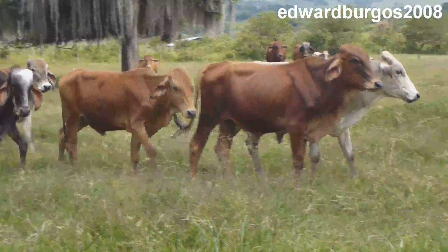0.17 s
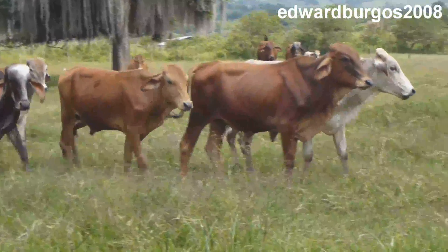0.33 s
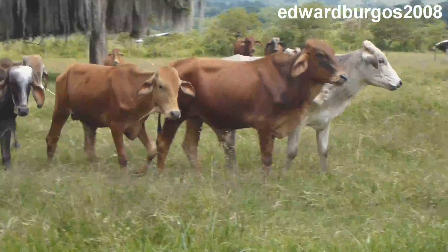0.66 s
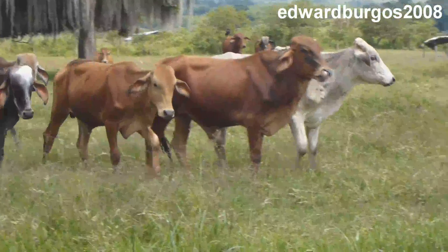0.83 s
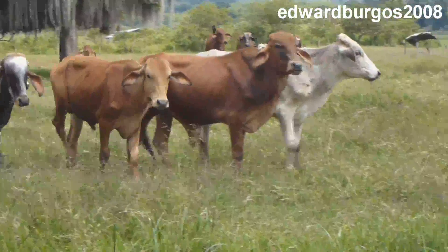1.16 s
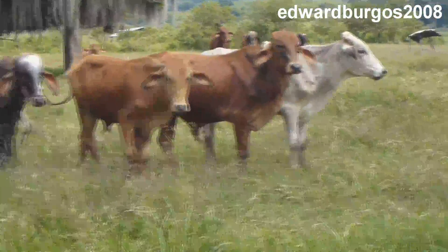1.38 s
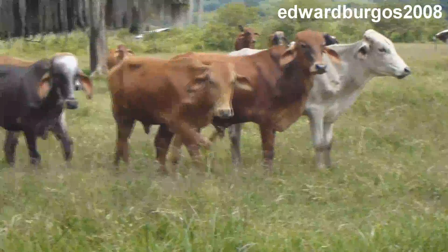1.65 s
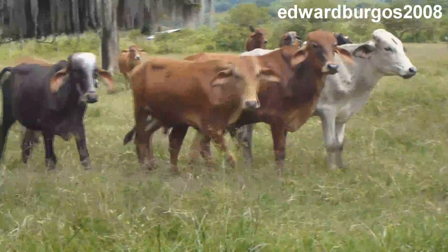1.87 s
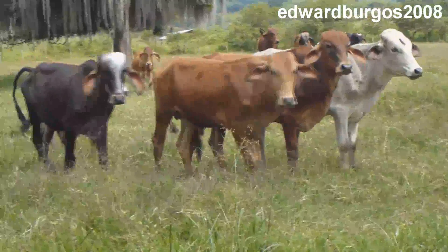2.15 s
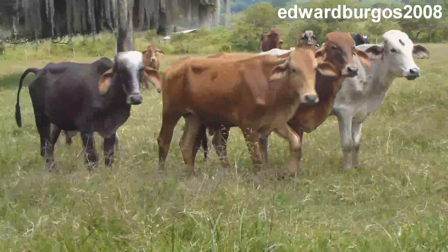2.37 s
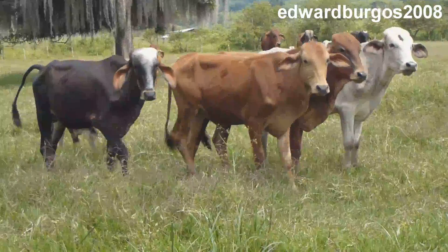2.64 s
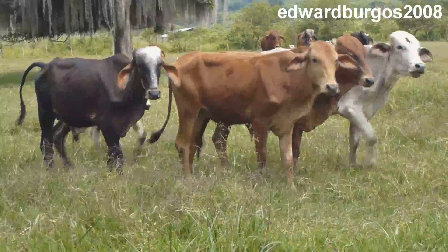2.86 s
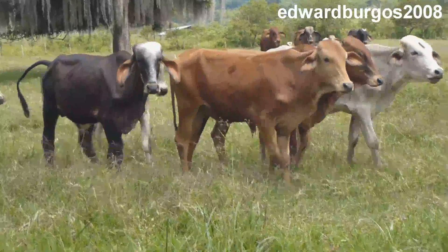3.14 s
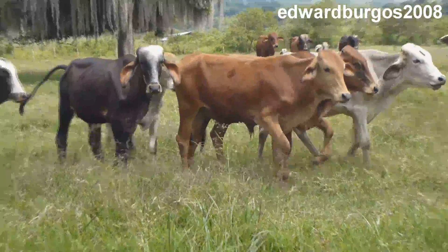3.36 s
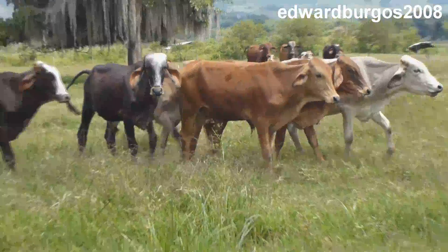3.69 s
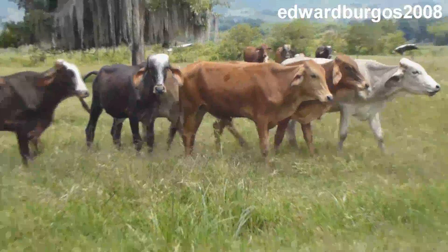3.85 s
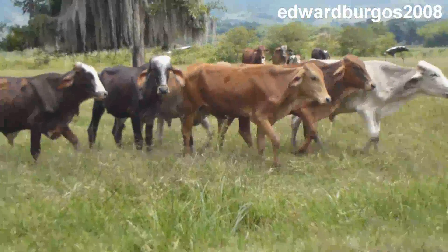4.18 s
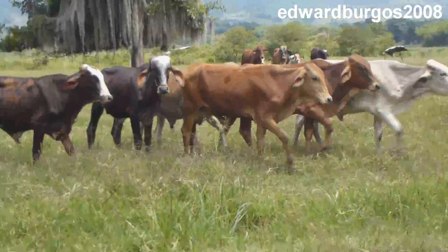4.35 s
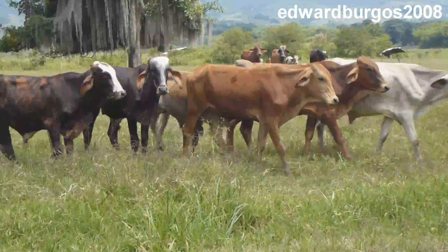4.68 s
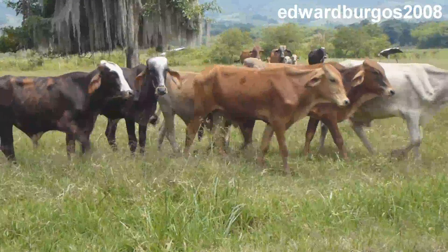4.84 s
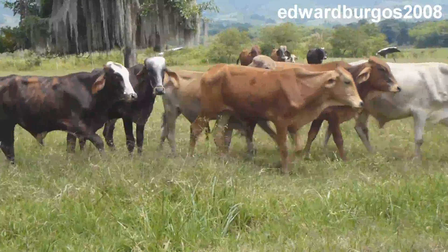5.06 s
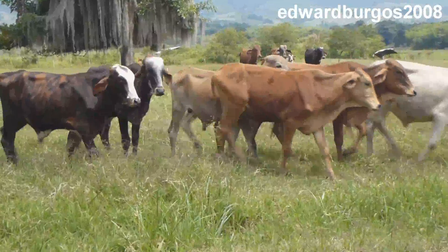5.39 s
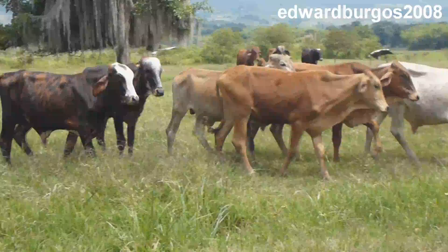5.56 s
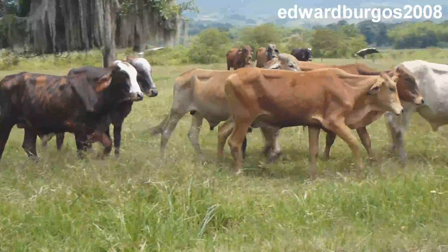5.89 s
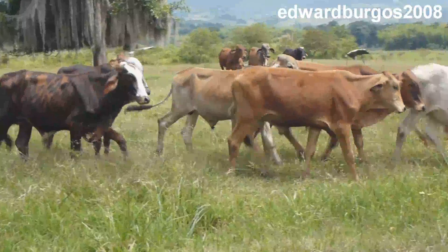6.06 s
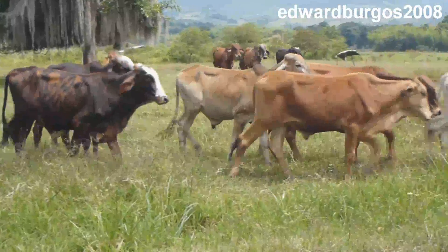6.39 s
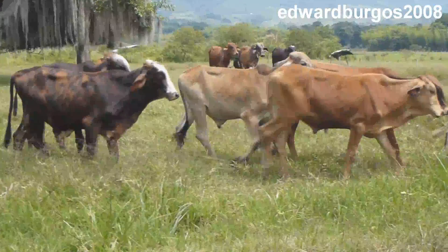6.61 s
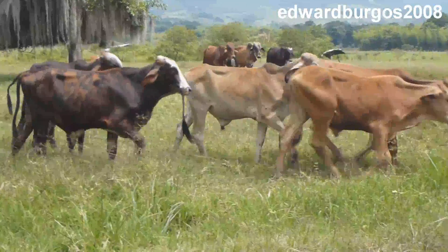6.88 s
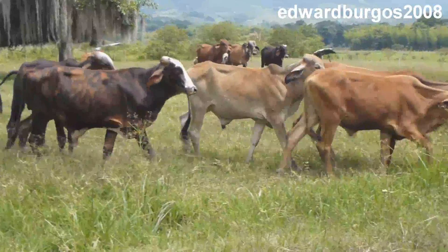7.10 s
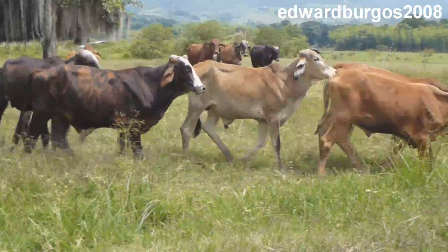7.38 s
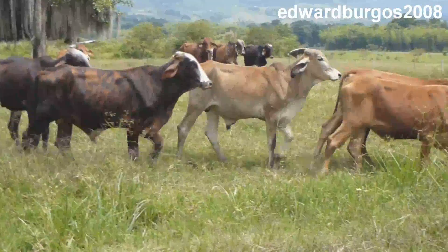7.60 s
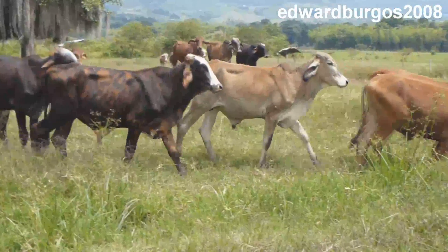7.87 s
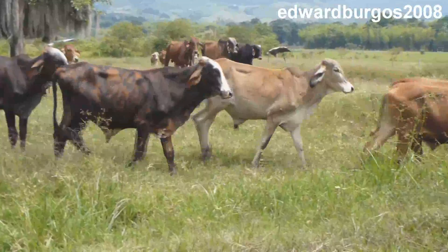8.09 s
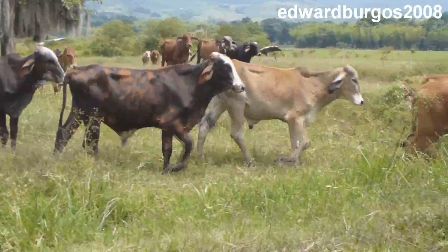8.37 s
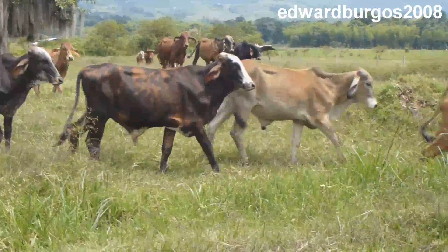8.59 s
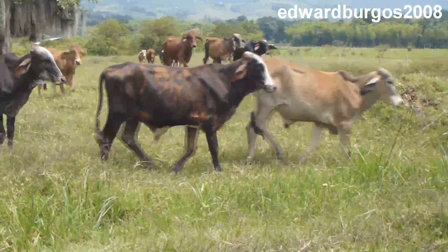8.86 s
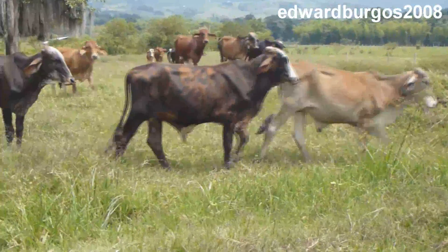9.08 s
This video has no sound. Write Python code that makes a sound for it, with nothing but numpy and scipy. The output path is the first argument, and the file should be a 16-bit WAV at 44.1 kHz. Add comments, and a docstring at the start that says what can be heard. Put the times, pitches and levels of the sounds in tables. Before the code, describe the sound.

A calf gives one long moo, hum opening to a high cracking call, as a bird whistles repeatedly in a breezy, grassy pasture.

```python
"""A calf gives one long moo in a breezy pasture: a closed-mouth hum opens into a bright call, flips up two octaves
and breaks off in a rasp. Its voice is sums of harmonics shaped by moving resonances, with noise for rough breath.
A near-sine whistle, likely a bird, repeats its rise, dip and flick; gliding sines chirp far off and one peep is nearer.
Grass hisses and ticks (shaped noise), and puffs of low noise are wind thumping on the two microphone ports."""
import sys
import numpy as np
from scipy import signal
from scipy.io import wavfile
from scipy.ndimage import uniform_filter1d

SR = 44100
rng = np.random.default_rng(int(sys.argv[2]) if len(sys.argv) > 2 else 0)


def wav_record(signal):
    """Record a signal, one row per channel, as 16-bit PCM in the file named by sys.argv[1]."""
    frames = np.transpose(np.atleast_2d(signal))
    bounded = np.clip(frames, -1, 1)
    # unit amplitude maps onto the largest positive 16-bit level
    quanta = np.round(bounded * 32767).astype(np.int16)
    wavfile.write(sys.argv[1], SR, quanta)


N = 407528
TIME = np.arange(N) / SR


def from_db(db):
    """Decibels to gain."""
    return 10 ** (np.asarray(db) / 20)


def rms_one(x):
    """Scale to rms 1."""
    return x / np.sqrt(np.mean(x ** 2) + 1e-20)


def evened(noise, size=1100):
    """Noise held at rms 1 from moment to moment, over a window of size samples."""
    return noise / np.sqrt(uniform_filter1d(noise ** 2, size=size, axis=1))


def in_time(rows, t=TIME):
    """The columns of a curve at times t; the first column is time."""
    s, *columns = np.transpose(rows)
    return [np.interp(t, s, c) for c in columns]


def at_hz(points, hz):
    """A spectrum in dB read on a log-frequency axis."""
    f, db = np.transpose(points)
    return np.interp(np.log(hz), np.log(f), db)


def drift(rate_hz):
    """Slow chance with spread 1: noise through a double one-pole low-pass at rate_hz, run at SR / 20."""
    r = np.exp(-40 * np.pi * rate_hz / SR)
    slow = signal.lfilter([1], [1, -2 * r, r * r], rng.standard_normal(N // 20 + 4002))
    slow = slow[4000:]  # drop the filter's settling
    return np.interp(np.arange(N) / 20, np.arange(len(slow)), rms_one(slow))


def band(x, low, high):
    """Band-pass between two frequencies in Hz."""
    return signal.sosfilt(signal.butter(2, [low, min(high, SR / 2 - 100)], "band", fs=SR, output="sos"), x)


def smooth(x, hz):
    """Steep low-pass."""
    return signal.sosfilt(signal.butter(8, hz, fs=SR, output="sos"), x)


def peak(hz, centre_hz, width_hz):
    """The bell shape of a resonance, 1 at its centre."""
    return 1 / (1 + (2 * (hz - centre_hz) / width_hz) ** 2)


def ramp(start, length):
    """From 0 to 1 over a length of time in seconds."""
    return np.clip((TIME - start) / length, 0, 1)


def gate(start, attack, end, release):
    """Attack, hold and release between two moments."""
    return ramp(start, attack) * (1 - ramp(end - release, release))


def swell(at, length):
    """A smooth bump about a moment."""
    return np.exp(-np.minimum((2 * (TIME - at) / length) ** 2, 50))


def pan(db):
    """Left and right gains for a level difference; positive is louder on the left."""
    gains = from_db(np.array([[db], [-db]]) / 2)
    return gains / np.sqrt(np.mean(gains ** 2))


def delayed(x, s):
    """The same sound, s seconds later."""
    return np.interp(TIME - s, TIME, x, left=0)


def scatter(x, t60, count=60):
    """Faint reflections from ground, animals and trees, falling 60 dB in t60 s, different at each port."""
    out = np.zeros((2, N))
    for side in out:
        lags = rng.uniform(0.0028, t60, count)
        gains = from_db(-60 * lags / t60) * rng.choice([-1, 1], count)
        gains = gains / np.linalg.norm(gains)
        for lag, gain in zip((lags * SR).astype(int), gains):
            side[lag:] += gain * x[:N - lag]
    return out


def banded_noise(spectrum, alike, patchy_db, flicker_rate_hz):
    """Half-octave bands of noise, each flickering on its own; alike is the ports' correlation; rms 1."""
    out, alike = 0, np.clip(alike, 0, 1)
    edges = 2 ** np.arange(np.log2(spectrum[0][0]), np.log2(spectrum[-1][0]) + .5, .5)
    white = rng.standard_normal((2, 2, N))
    shared = np.sqrt(1 + alike) * white[:, :1]
    opposed = np.sqrt(1 - alike) * white[:, 1:] * [[1], [-1]]
    ports = shared + opposed
    for k, (low, high) in enumerate(zip(edges, edges[1:])):
        gain = from_db(at_hz(spectrum, np.sqrt(low * high)) + patchy_db * drift(flicker_rate_hz))
        out = out + gain * band(ports[k % 2], low, high)  # neighbouring bands use independent noise
    return rms_one(out)


def field():
    """The low, restless murmur of the breeze over open ground: flickering bands of noise."""
    # slow loudness of the open air before the trim: time_s, level_db
    air_level = [(.25, -53), (1.1, -46.5), (4.8, -49), (5.6, -46), (7.3, -51.5), (8.4, -51.5),
                 (9.24, -47.5)]
    # its colour: frequency_hz, density_db (relative dB per Hz)
    air_colour = [(30, -9), (80, 3), (160, 0), (280, -5.5), (450, -16), (750, -13.5), (1100, -22.5),
                  (2000, -22), (3500, -45.5)]
    murmur = banded_noise(air_colour, alike=0.23, patchy_db=3.0, flicker_rate_hz=4.35)
    return from_db(in_time(air_level)[0] + 5.5) * murmur


def faint_puffs():
    """Small puffs, evenly spaced but for random jitter, as rows like the strong ones."""
    rate_per_s, length_s, flutter_db = 3, 0.035, -11
    mean_db, spread_db, mean_side_db = -45.5, 4.5, 7
    draws = rng.standard_normal((int(rate_per_s * N / SR), 3))
    return [((k + .5 + 0.304 * late) / rate_per_s, length_s, mean_db + spread_db * size,
             mean_side_db + 5 * side, flutter_db)
            for k, (late, size, side) in enumerate(draws)]


def wind(flutter_share=0.81, fine_db=-14):
    """Each puff is a short lump of low turbulence; the sharper it is, the more small and fine eddies it sheds."""
    # strong puffs on the ports: middle_s, length_s, level_db, left_right_db, flutter_db (against the puff)
    strong_puffs = [(.008, 0.021, -23.5, 2, -6.5), (.06, 0.042, -23.5, -1, -4.5),
                    (.171, 0.056, -23.5, -2.5, 0), (.226, 0.037, -18, -6.5, -2.5),
                    (.4, 0.083, -29.5, -2, -21), (.672, 0.052, -26, -0.5, -5.5),
                    (.79, 0.042, -29.5, -8, -33), (.857, .044, -33, -6, -10),
                    (1.281, 0.054, -37.5, -2, -19), (1.448, 0.038, -33, 4, -16),
                    (1.552, 0.057, -22.5, -5, -14), (1.594, 0.048, -22.5, -3, -9.5),
                    (1.672, 0.025, -22.5, -6.5, -12), (1.735, 0.06, -27.5, -7, -23),
                    (1.875, 0.028, -23, -4, -13), (1.93, 0.032, -26.5, -7, -34),
                    (2.04, 0.28, -35.5, -2, -27), (2.435, 0.052, -36.5, 6, -15),
                    (3.177, .044, -31.5, -16, -14), (3.24, 0.04, -29, 11, -18),
                    (3.348, 0.041, -29, -1, -18), (3.432, 0.062, -30.5, -11, -24),
                    (3.668, .044, -33, -12, -5), (3.93, 0.052, -25.5, -2, -8), (4.024, 0.037, -36, -6, -17),
                    (4.9, 0.094, -35, -0.5, -20), (5.444, 0.035, -35, 2, -15),
                    (5.674, 0.032, -20.5, 3, -8.5), (5.84, 0.096, -29.5, -4, -10.5),
                    (6.285, 0.035, -23.5, 3, -8), (6.415, 0.049, -37, -4, -1),
                    (6.57, 0.033, -20.5, -4.5, 1), (6.634, 0.044, -28.5, 4, -4),
                    (7.009, 0.032, -30.5, -2, -3.5), (7.059, 0.04, -24.5, 1, -7.5),
                    (7.173, 0.04, -27.5, 10, -32), (7.386, 0.019, -20.5, -6, -27),
                    (7.495, 0.027, -19.5, -10, -5.5), (7.548, 0.043, -21.5, -7, -5),
                    (7.609, 0.077, -26, 2, -4), (7.65, .04, -24.5, -3, -2.5), (7.685, 0.046, -29, -2, 0.5),
                    (7.733, 0.044, -27, -7, 0.5), (7.785, 0.048, -29.5, 0, -0.5),
                    (7.839, 0.027, -25, 0, -22), (7.896, 0.057, -25.5, -1, -6),
                    (7.929, 0.037, -26, -4.5, 0.5), (8.045, 0.076, -32, 0, -30),
                    (8.212, 0.041, -29, 0, -24), (8.279, 0.054, -26, 7, -29),
                    (8.379, 0.088, -33, -0.5, -26), (8.638, 0.041, -32, -2, -23),
                    (8.723, 0.049, -25, -6.5, -4.5), (8.807, 0.098, -33.5, -10, -6),
                    (9.021, 0.085, -35, 2, -28)]
    # large, small and finest eddies, each: frequency_hz, density_db (relative dB per Hz)
    large_colour = [(25, -17), (50, -9), (90, 2), (140, 1.5), (200, -7.5), (280, -50)]
    small_colour = [(150, 9), (220, 11.5), (310, -4.5), (430, -27), (600, -49)]
    fine_colour = [(250, -3), (350, 5), (430, -4), (500, -8)]

    rumble, flutter, sharp = np.zeros((3, 2, N))  # power envelopes at the two ports
    for at, length, level_db, side_db, flutter_db in list(strong_puffs) + faint_puffs():
        on = slice(*np.searchsorted(TIME, [at - 4 * length, at + 4 * length]))
        power = (from_db(level_db) * pan(side_db)) ** 2
        away = 2 * (TIME[on] - at) / length
        rumble[:, on] += power / (1 + away ** 2) ** 3
        # the flutter is squeezed closer to the puff's middle
        shed = power * from_db(flutter_db) ** 2 / (1 + (away / flutter_share) ** 2) ** 3
        flutter[:, on] += shed
        sharp[:, on] += shed * from_db(flutter_db) ** 2
    large = evened(banded_noise(large_colour, alike=0.13, patchy_db=3, flicker_rate_hz=21.3))
    small = evened(banded_noise(small_colour, alike=0.054, patchy_db=5.5, flicker_rate_hz=10.2))
    fine = evened(banded_noise(fine_colour, alike=0.028, patchy_db=-3.5, flicker_rate_hz=19))
    return np.sqrt(rumble) * large + np.sqrt(flutter) * small + from_db(fine_db) * np.sqrt(sharp) * fine


def grass(hiss_db=4, ticks_per_s=90, ticks_db=-13):
    """A soft noise hiss of blades, tiny random ticks of dry stalks, and a few close swishes of noise."""
    # slow loudness of the grassy hiss, often sinking around strong wind puffs, before hiss_db: time_s, level_db
    hiss_level = [(0.0, -59.5), (0.28, -60), (1.34, -54.5), (1.83, -58), (2.91, -51), (4.01, -55),
                  (5.43, -48.5), (5.68, -53), (6.1, -51), (6.74, -55), (7.59, -52), (7.95, -55.5),
                  (8.98, -48), (9.24, -51.5)]
    # colour of the blades: frequency_hz, density_db (relative dB per Hz)
    blade_colour = [(880, -37), (1500, -9), (2490, -3), (3000, -2.5), (3520, -3), (3960, 0), (10000, -2.5),
                    (11900, -5), (15200, -8), (16000, -17)]
    # stalks brushed close by: middle_s, length_s, lowest_hz, highest_hz, level_db
    swishes = [(2.598, 0.082, 1800, 6600, -43), (4.141, 0.045, 6800, 15000, -35),
               (4.232, 0.05, 3480, 6950, -43)]

    level_db, = in_time(hiss_level)
    hiss = banded_noise(blade_colour, alike=0.019, patchy_db=2.5, flicker_rate_hz=7.7)
    sizes = from_db(np.minimum(rng.exponential(1, (2, N)), 4))
    struck = rng.random((2, N)) < ticks_per_s / SR
    ticks = rms_one(band(sizes * struck, 2500, 10300))
    out = from_db(level_db + hiss_db) * (hiss + from_db(ticks_db) * ticks)
    for at, length, low_hz, high_hz, swish_db in swishes:
        brushed = rms_one(band(rng.standard_normal((2, N)), low_hz, high_hz))
        out += from_db(swish_db) * pan(1.8) * swell(at, length) * brushed
    return out


def far_birds(echo_t60=.17):
    """Short fluttering sine glides on the left, blurred by distance through scattered reflections."""
    # distant chirps: middle_s, length_s, start_hz, end_hz, level_db (before flutter)
    chirps = [(0.252, 0.085, 2740, 2900, -58), (0.318, 0.093, 2900, 2770, -51), (.4, .09, 2720, 2470, -58),
              (1.508, 0.14, 5500, 6240, -49.5), (1.771, .04, 3680, 3800, -33.5),
              (4.738, 0.092, 4960, 4800, -50), (4.878, 0.033, 4700, 4710, -33.5),
              (5.178, 0.093, 5140, 4640, -45), (5.324, 0.04, 4400, 4160, -42), (5.39, .04, 3850, 3580, -40),
              (5.445, 0.042, 3650, 4130, -45), (5.478, .04, 4000, 3680, -39.5),
              (5.53, 0.044, 3750, 3490, -43), (5.567, .04, 3580, 4040, -43),
              (5.675, 0.054, 4930, 4690, -46), (5.823, 0.034, 4960, 4450, -41),
              (5.862, 0.068, 3970, 3850, -44), (5.91, 0.035, 3200, 3340, -44),
              (5.932, 0.042, 3470, 3770, -38), (5.994, 0.084, 3010, 2910, -37),
              (6.052, 0.036, 3200, 3720, -43), (6.06, 0.042, 2800, 2620, -41.5),
              (6.111, 0.057, 2500, 2403, -45)]
    waver, flutter_db = .022, 4
    out, wobble = np.zeros(N), 1 + waver * drift(120)
    flutter = from_db(flutter_db * (drift(90) - .5))
    for at, length, start_hz, end_hz, level_db in chirps:
        on = np.abs(TIME - at) < length  # soft edges reach past the nominal length
        glide = (TIME[on] - at) / length + .5
        pitch = (start_hz + (end_hz - start_hz) * glide) * wobble[on]
        note = np.sin(2 * np.pi * np.cumsum(pitch) / SR)
        out[on] += from_db(level_db) * flutter[on] * np.hanning(len(pitch)) ** 2 * note
    return out * pan(25) + 0.56 * scatter(out, echo_t60)


def whistle_shape(at, lead, scoop, rise, sag, flick, start_hz, knee_hz, crest_hz, dip_hz, end_hz,
                  rise_db, crest_db, dip_db):
    """Pitch, loudness and huskiness of one whistle: a soft scoop, a crest, a sag and a flick that breaks up."""
    attack_s, release_s, hold_share = .02, 0.051, 0.59  # the rise holds its level for hold_share of its length
    lead_in_db, catch_s = -10, 0.023  # it starts weak and husky, then the tone catches
    lead_in_hoarse, flick_hoarse = .25, .6  # noisy share of the power added there
    knee, crest, dip, end = at + scoop, at + rise, at + rise + sag, at + rise + sag + flick
    # a long rise is slow to get going, a short one levels off early
    climb = ramp(knee, crest - knee) ** max((rise / .25) ** 2, .7)
    pitch = (start_hz + (knee_hz - start_hz) * ramp(at, scoop) ** 1.5
             + (crest_hz - knee_hz) * climb
             + (dip_hz - crest_hz) * np.sin(np.pi / 2 * ramp(crest, sag)) ** 2
             + (end_hz - dip_hz) * ramp(dip, flick) ** 1.5)
    leading = 1 - ramp(at + lead - catch_s / 2, catch_s)
    level_db = np.interp(TIME, [at + hold_share * rise, crest, dip], [rise_db, crest_db, dip_db])
    level_db = level_db + lead_in_db * leading
    husky = lead_in_hoarse * leading + flick_hoarse * ramp(dip, flick) ** 2
    return pitch, from_db(level_db) * gate(at, attack_s, end, release_s), husky


def whistler(waver=0.006, strain_hz=2900, near_db=-7, near_t60=.2, far_db=-17, far_t60=0.8, split_db=-11,
             split_hz=450, hiss_db=-18, octave_db=-31, port_lag_s=.000045):
    """A near-sine from the right, fluttering with reflections; noise splits it when high and at both ends."""
    # whistles, levels before the trim: start_s, lead_in_s, scoop_s, rise_s (from the start), sag_s, flick_s,
    # start_hz, knee_hz, crest_hz, dip_hz, end_hz, rise_db, crest_db, dip_db
    whistles = [(1.367, 0.051, 0.096, 0.22, .12, 0.078, 2220, 2802, 3176, 2800, 3404, -22.5, -36, -26),
                (2.56, 0.071, .133, .253, 0.091, 0.088, 2270, 2728, 2940, 2686, 3124, -21.5, -29.5, -22),
                (3.78, .025, .041, .155, .105, .105, 2300, 2524, 2738, 2622, 2990, -29, -25.5, -28.5),
                (5.352, .053, .058, .333, 0.071, 0.065, 2220, 2660, 3045, 2885, 3220, -28.5, -50, -32.5),
                (6.648, 0.025, .055, .185, .09, .1, 2330, 2490, 2793, 2700, 3094, -34.5, -34, -35.5),
                (7.775, .075, .13, 0.21, .13, 0.081, 2440, 2807, 2722, 2706, 3180, -35, -40, -36),
                (9.021, 0.04, 0.079, 0.2, 0.11, .1, 2310, 2550, 2634, 2580, 3100, -39, -39.5, -40)]
    # moments when reflections strengthen or weaken the whistle: middle_s, length_s, change_db
    reflection_changes = [(1.473, 0.024, 4), (1.676, 0.047, 10.5), (1.692, 0.015, -13.5),
                          (1.719, 0.028, -18), (2.745, 0.017, 4.5), (2.944, 0.011, 3.5), (3.864, .016, -5),
                          (3.898, 0.039, 6.5), (4.022, 0.031, -9), (4.086, 0.032, 4), (5.456, 0.011, -7),
                          (5.478, .045, 9), (5.717, .03, -7), (5.78, 0.037, 2.5), (6.695, 0.022, 2),
                          (6.9, 0.025, 7), (7.002, 0.021, 11.5), (7.914, 0.02, 11), (8.048, .022, 9),
                          (8.09, .014, -12), (8.161, 0.02, 8.5), (9.1, 0.016, 8.5)]
    hoarse, grit_hz, flutter_db, flutter_rate_hz = .07, 150, 3.2, 55

    tone, airflow = np.zeros(N), np.zeros(N)
    wobble = 1 + waver * smooth(drift(73), 137)
    change_db = sum(db * swell(at, length) for at, length, db in reflection_changes)
    flutter = from_db(flutter_db * smooth(np.minimum(drift(flutter_rate_hz), 1), grit_hz) + change_db)
    grit = rms_one(smooth(rng.standard_normal((2, N)), grit_hz))
    for row in whistles:
        pitch, loudness, husky = whistle_shape(*row)
        on = loudness > 0
        pitch, loudness = pitch[on], (loudness * flutter)[on]
        phase = 2 * np.pi * np.cumsum(pitch * wobble[on]) / SR
        # noisy share of the power grows steeply with pitch
        share = np.clip(hoarse * (pitch / strain_hz) ** 20 + husky[on], 0, .85)
        rough_part = np.sqrt(share / 2) * (grit[0, on] + 1j * grit[1, on])
        line = (np.sqrt(1 - share) + rough_part) * np.exp(1j * phase)
        split = from_db(split_db) * share * grit[0, on] * np.cos(phase + 2 * np.pi * split_hz * TIME[on])
        tone[on] = np.sqrt(2) * loudness * (line.real + split)
        tone[on] += from_db(octave_db) * loudness * (line ** 2).real
        airflow[on] = loudness * share
    tone += from_db(hiss_db) * airflow * rms_one(band(rng.standard_normal(N), 1420, 5000))
    direct = np.array([delayed(tone, port_lag_s), tone]) * pan(-9)
    near = from_db(near_db) * scatter(tone, near_t60) * pan(-2.8)
    far = from_db(far_db) * scatter(tone, far_t60)
    return from_db(-0.94) * (direct + near + far)


def fold_phase(pitch, rough, jitter=0.077, tremor=0.0016):
    """Phase of the vocal folds: roughness makes their period uneven."""
    uneven = 1 + jitter * rough * drift(120.0) + tremor * drift(31.6)
    return 2 * np.pi * np.cumsum(pitch * uneven) / SR


def chest_voice(rough, shimmer=1.0, waver_db=2.5, resonance_width_hz=130, narrowing=0.48, gain_db=0.24, count=36):
    """Low harmonics sweep through the throat's resonances; the opening mouth lets the upper ones out."""
    # chest register: time_s, pitch_hz
    chest_pitch = [(2.6, 96), (2.65, 95.6), (2.764, 103.8), (2.85, 107), (2.982, 119.3), (3.1, 134.8),
                   (3.32, 147.5), (3.688, 154.1), (3.856, 164.8), (3.9, 156.2), (3.935, 149.2)]
    # its effort, before gain_db: time_s, level_db
    chest_level = [(2.6, -32), (2.62, -41.5), (3.026, -31.5), (3.048, -27), (3.29, -19), (3.362, -20.5),
                   (3.872, -22), (3.895, -16)]
    # what leaves the open mouth, before weighting by the opening: frequency_hz, relative_db
    open_mouth = [(150, -19), (300, -6), (450, -20), (600, -10.5), (750, -10.5), (900, -3.5), (1050, 1),
                  (1330, -8.5), (1520, -8), (1740, -15), (2120, -13.5), (2400, -26), (2600, -20),
                  (2950, -17), (3800, -53), (6000, -55)]
    # what leaves through the nose, before weighting by the opening: frequency_hz, relative_db
    shut_mouth = [(100, 1), (300, 7), (420, -5.5), (640, 5.5), (760, 3.5), (950, -21.5), (1400, -10.5),
                  (1750, -35), (2200, -13.5), (3500, -52)]
    # resonances of throat and nose: frequency_hz
    throat_hz = [290, 630, 770, 1280, 1480, 2120, 2600]
    # jaw and lips move the mouth's resonances: time_s, first_hz, second_hz, third_hz
    mouth_resonances = [(3.05, 659, 1295, 2180), (3.3, 746, 1300, 2220), (3.5, 705, 1485, 2100),
                        (3.72, 700, 1595, 2040), (3.88, 760, 1373, 2110)]
    # moving notches in the call, likely from sound reflected off the ground: time_s, first_hz, second_hz, third_hz
    ground_notches = [(3.08, 990, 1850, 2470), (3.25, 1076, 1590, 2280), (3.38, 1025, 1800, 2420),
                      (3.52, 980, 1690, 2400), (3.66, 1100, 1650, 2410), (3.78, 1210, 1800, 2700)]
    mouth_peak_db, mouth_width_hz, ground_notch_db, ground_notch_width_hz = 9, 155, -14, 78.6
    # brightness in dB per octave of harmonic number; once open it rises with each octave of pitch
    shut_tilt_db, open_tilt_db, tilt_rise_db, easy_pitch_hz = 3.5, 0.5, 17.5, 150.3

    envelope = gate(start=2.56, attack=0.084, end=3.95, release=0.095)
    envelope = envelope * from_db(in_time(chest_level)[0] + gain_db)
    on = envelope > 0
    pitch, = in_time(chest_pitch)
    # the mouth snaps open to a share of 0.97 and narrows again towards the break
    mouth = (0.97 * ramp(3.02, 0.026) * (1 - ramp(3.738, 1 / 2.1)))[on]
    tilt_when_open = open_tilt_db + tilt_rise_db * np.log2(pitch[on] / easy_pitch_hz)
    tilt_db = (1 - mouth) * shut_tilt_db + mouth * tilt_when_open
    phase, k = fold_phase(pitch, rough)[on], np.arange(1, count + 1)[:, None]
    hz = k * pitch[on]
    # no two closures are alike: the higher a harmonic, the more it wavers, up to a limit
    unsteady_db = waver_db * np.minimum(hz / 1400, 2) * np.array([drift(10.6)[on] for _ in k])
    # a half-open mouth holds the fixed resonances lower
    opened = at_hz(open_mouth, hz * (1 + narrowing * np.clip(1 - mouth, 0, .3)))
    for mouth_hz in in_time(mouth_resonances, TIME[on]):
        opened = opened + mouth_peak_db * peak(hz, mouth_hz, mouth_width_hz)
    for notch_hz in in_time(ground_notches, TIME[on]):
        opened = opened + ground_notch_db * peak(hz, notch_hz, ground_notch_width_hz)
    # at the break the low harmonics, below 720 Hz, fall away
    thinning_db = -14.5 * ramp(3.855, .025)[on] * (hz < 720)
    through_nose = (1.5 - mouth) * at_hz(shut_mouth, hz)
    gains = from_db(thinning_db + mouth * opened + through_nose + tilt_db * np.log2(k) + unsteady_db)
    # each resonance passed delays the harmonics above it by half a turn
    lag = sum(np.arctan(2 * (hz - centre) / resonance_width_hz) for centre in throat_hz)
    out = np.zeros(N)
    out[on] = np.sum(gains * np.cos(k * phase - lag), axis=0) / np.sqrt(np.sum(gains ** 2, axis=0) / 2)
    return out * envelope * (1 + shimmer * rough * drift(150))


def high_voice(rough, beat_depth=0.022, second_db=-28, shimmer=0.84, second_spread=0.0334):
    """A nearly pure high note; a slower, unsteady second vibration puts side tones around each overtone."""
    # high register, before the trims: time_s, pitch_hz, level_db, overtone_lift_db (against the note)
    high_notes = [(3.893, 594, -21, -15), (3.928, 575, -20.5, -13.5), (3.96, 573, -22.5, -6.5),
                  (4.114, 587.2, -16.5, -10), (4.198, 581.8, -20, -6.5), (4.258, 574.3, -19.5, -9),
                  (4.378, 580.5, -18, -6), (4.44, 565, -17.5, -11), (4.482, 521, -25, -4.5)]
    # its overtones before lift, notch and resonance: multiple, level_db
    overtones = [(1, 2.5), (2, -5), (3, -20.5), (4, -19.5), (5, -14)]
    # a nasal notch slides down through the note: time_s, frequency_hz
    notch = [(3.93, 2000), (4.02, 1740), (4.243, 1160), (4.33, 910)]
    # a resonance sinks through the overtones as the mouth closes: time_s, frequency_hz
    upper_resonance = [(3.93, 3020), (4.09, 2330), (4.18, 1880), (4.3, 1450), (4.36, 1610), (4.47, 1580)]
    second_hz, attack_s, release_s, level_trim_db, overtone_trim_db = 258, 0.029, 0.012, -0.5, 5.5
    notch_db, notch_width_hz, upper_db, upper_width_hz = -18, 46, 9, 310

    pitch, level_db, lift_db = in_time(high_notes)
    notch_hz, = in_time(notch)
    upper_hz, = in_time(upper_resonance)
    second = np.cos(fold_phase(second_hz * (1 + second_spread * drift(63)), rough))
    sway = .13 * (1 + .7 * drift(25))  # phase swing in radians
    phase = fold_phase(pitch, rough)
    wave = 0
    for k, (_, db) in enumerate(overtones):
        hz = (k + 1) * pitch
        colour_db = db + notch_db * peak(hz, notch_hz, notch_width_hz) + upper_db * peak(hz, upper_hz, upper_width_hz)
        colour_db = colour_db + (lift_db + overtone_trim_db) * (k > 0)
        swayed = (k + 1) * phase + min(k + 1, 2) * sway * second - k * np.pi / 2
        wave = wave + from_db(colour_db) * np.cos(swayed)
    wave = band(wave * (1 + beat_depth * second + shimmer * rough * drift(120)), 560, 2150)
    wave = wave + (from_db(second_db) + .5 * rough) * second
    envelope = gate(high_notes[0][0] - attack_s, attack_s, high_notes[-1][0] + release_s, release_s)
    return np.sqrt(2) * from_db(level_db + level_trim_db) * wave * envelope


def last_rasp(rough, shimmer=1.0, count=9):
    """The voice drops about an octave and dies in a short burst of harmonics from uneven folds."""
    # last catch of the voice: time_s, pitch_hz
    rasp_pitch = [(4.505, 282), (4.53, 310.5)]
    # its harmonics: frequency_hz, relative_db
    rasp_colour = [(290, -2.5), (590, 4), (900, -9.5), (1200, -5), (1580, -18), (1900, -36), (2300, -20),
                   (2900, -15)]
    pitch, = in_time(rasp_pitch)
    envelope = from_db(-25) * gate(start=4.478, attack=0.011, end=4.578, release=0.067)
    on, k = envelope > 0, np.arange(1, count + 1)[:, None]
    gains = from_db(at_hz(rasp_colour, k * pitch[on]))
    out = np.zeros(N)
    out[on] = rms_one(np.sum(gains * np.cos(k * fold_phase(pitch, rough)[on] - k ** 2), axis=0))
    return out * envelope * (1 + shimmer * rough * drift(160))


def calf(rasp_db=-6, echo_db=-22, echo_t60=0.67, slap_s=.16, slap_db=-29, herd_db=-12, herd_t60=0.13,
         port_lag_s=.00002):
    """Chest hum, high note and rasp, with turbulent air in two throat resonances where the folds are rough."""
    # the folds turn irregular at the start, the mouth's opening, the break and the end:
    # middle_s, length_s, added_roughness (0-1)
    rough_moments = [(2.55, .16, .3), (3.04, .08, .09), (3.876, .045, .3), (4.52, .1, .36)]
    clear_roughness, voice_top_hz = .03, 2970
    rough = clear_roughness + sum(amount * swell(at, length) for at, length, amount in rough_moments)
    voice = smooth(chest_voice(rough) + high_voice(rough) + last_rasp(rough), voice_top_hz)
    loudness = np.sqrt(np.abs(uniform_filter1d(voice ** 2, size=600)))
    turbulence = rng.standard_normal(N)
    air = band(band(turbulence, 710, 760) + 2.3 * band(turbulence, 1490, 1610), 400, 2900)
    voice = voice + from_db(rasp_db) * rough * loudness * rms_one(air)
    direct = np.array([delayed(voice, port_lag_s), voice]) * pan(-1.2)
    # the bodies of the herd throw back the upper harmonics, the trees one soft echo and a faint tail
    herd = from_db(herd_db) * scatter(band(voice, 710, 3900), herd_t60)
    slap = from_db(slap_db) * delayed(voice, slap_s)
    tail = from_db(echo_db) * scatter(voice, echo_t60)
    return direct + herd + slap + tail


def peep(echo_db=-14, echo_t60=0.098, side_db=12):
    """One short, clear peep from nearer by on the left: a sine with a faint octave."""
    at_s, length_s, pitch_hz, level_db, octave_db = 6.917, 0.02, 4891, -26.5, -22
    phase = 2 * np.pi * pitch_hz * TIME
    note = np.sin(phase) + from_db(octave_db) * np.sin(2 * phase)
    note = from_db(level_db) * swell(at_s, length_s) * note
    return note * pan(side_db) + from_db(echo_db) * scatter(note, echo_t60)


def scene():
    """Everything in the pasture, in order of first appearance."""
    return field() + wind() + grass() + far_birds() + whistler() + calf() + peep()


def record(dry):
    """The top is cut steeply above 15.9 kHz."""
    return signal.sosfilt(signal.ellip(10, .1, 80, 15900, fs=SR, output="sos"), dry)


dry = scene()
out = record(dry)
wav_record(out)
```